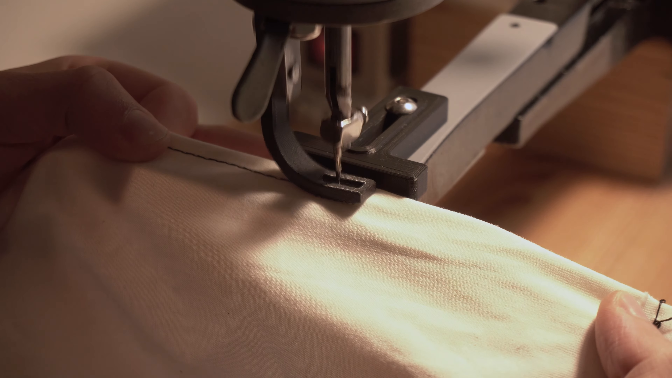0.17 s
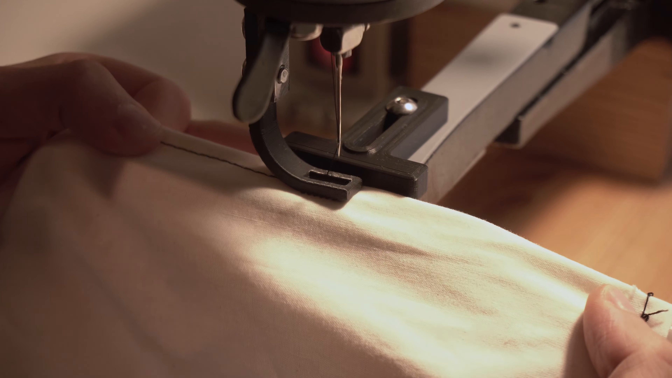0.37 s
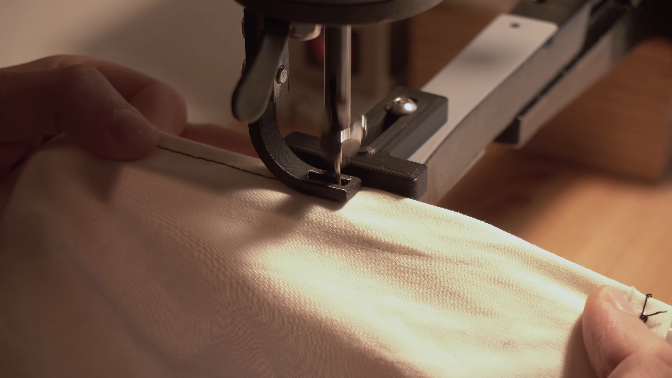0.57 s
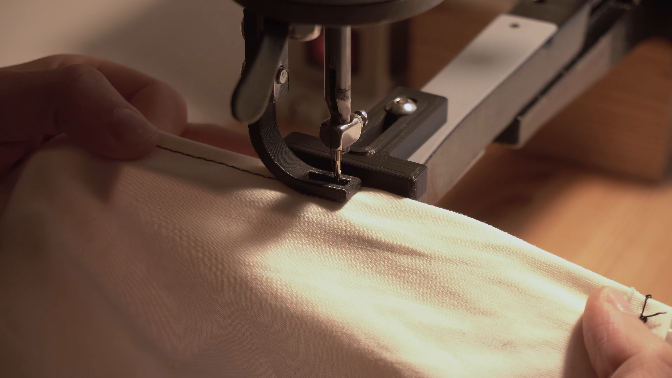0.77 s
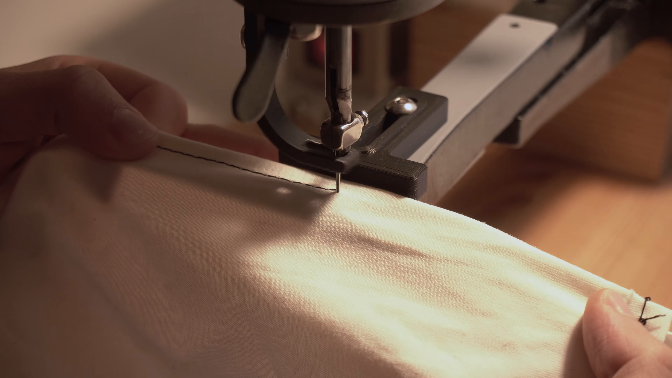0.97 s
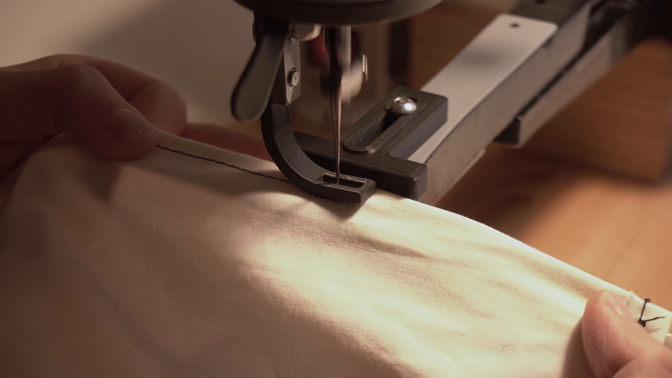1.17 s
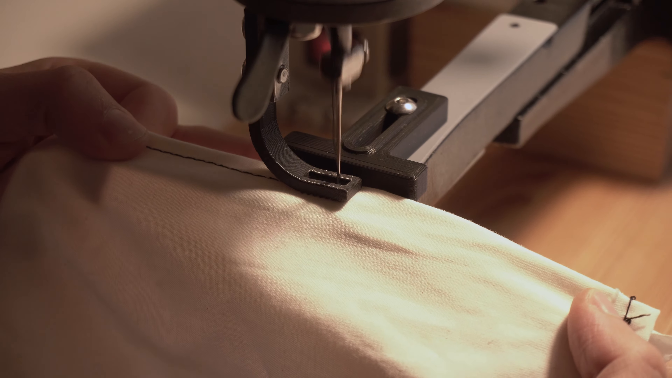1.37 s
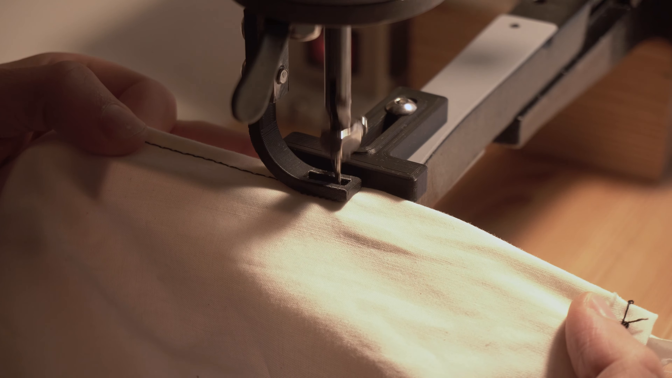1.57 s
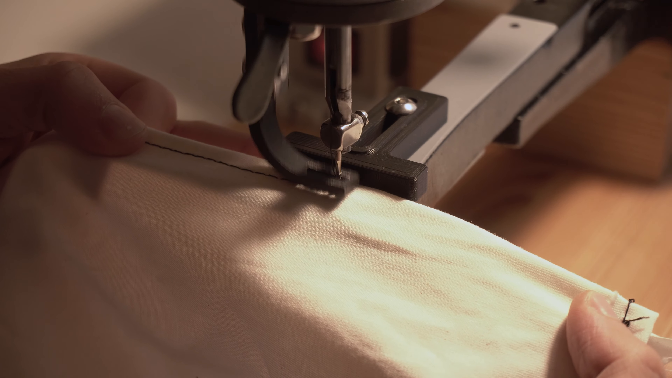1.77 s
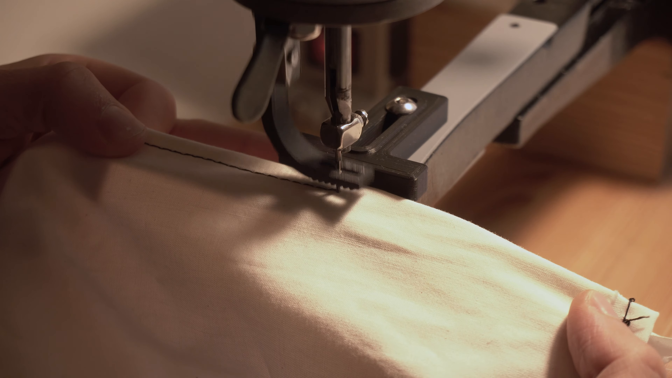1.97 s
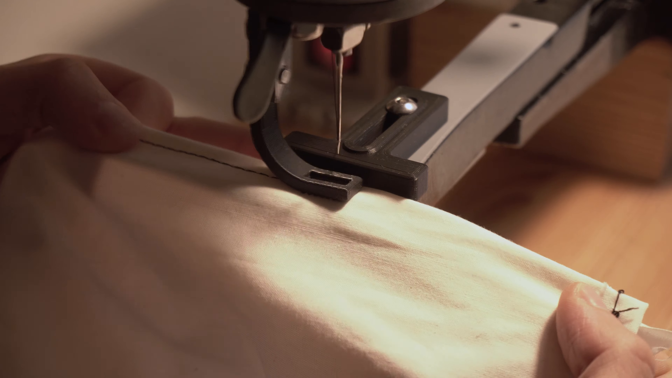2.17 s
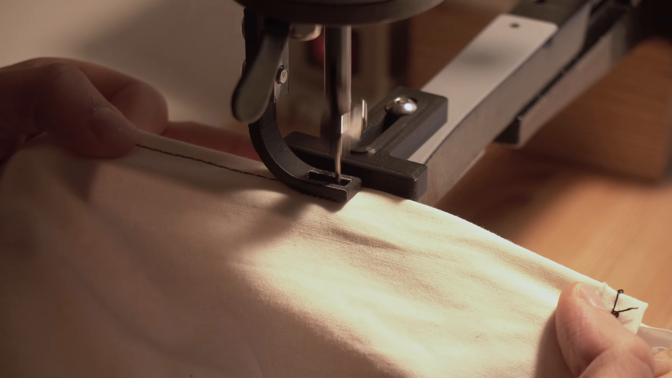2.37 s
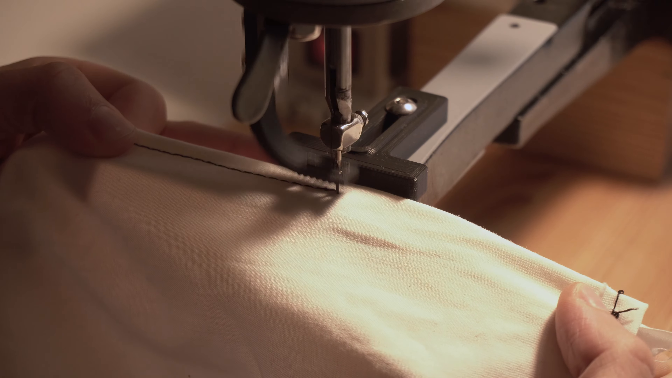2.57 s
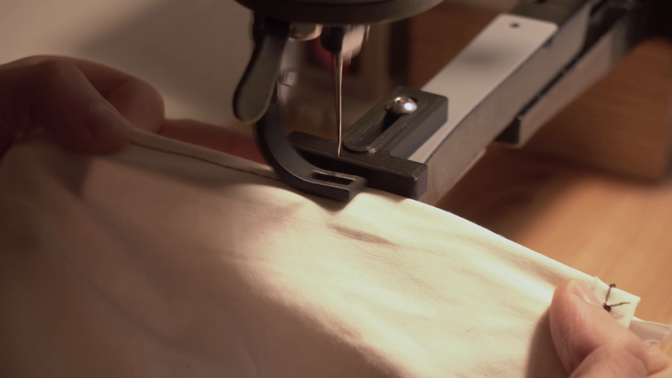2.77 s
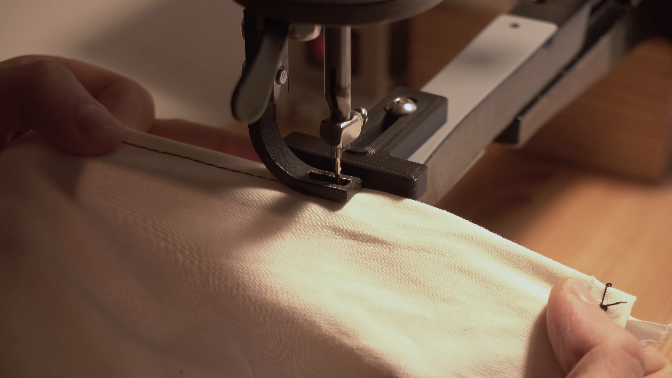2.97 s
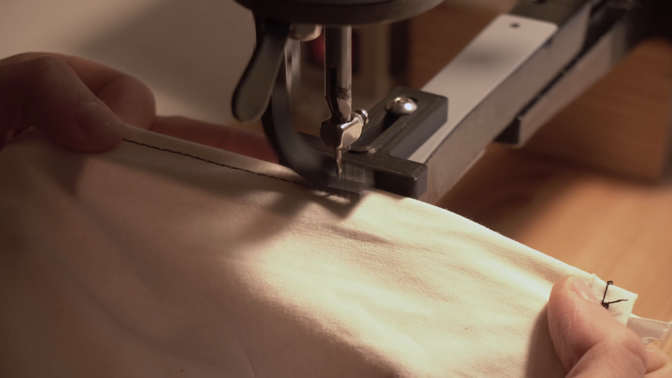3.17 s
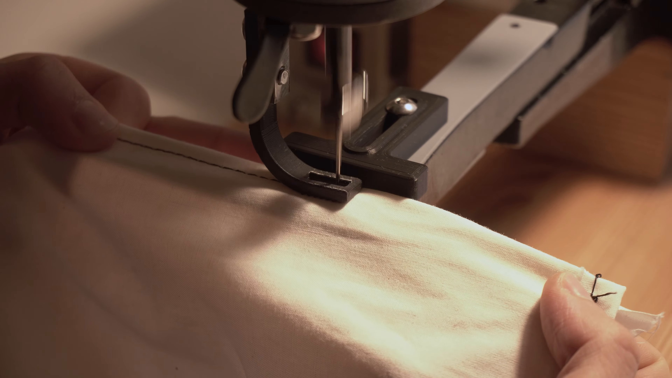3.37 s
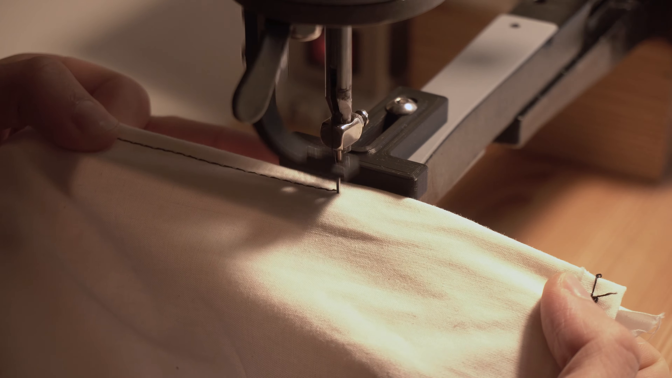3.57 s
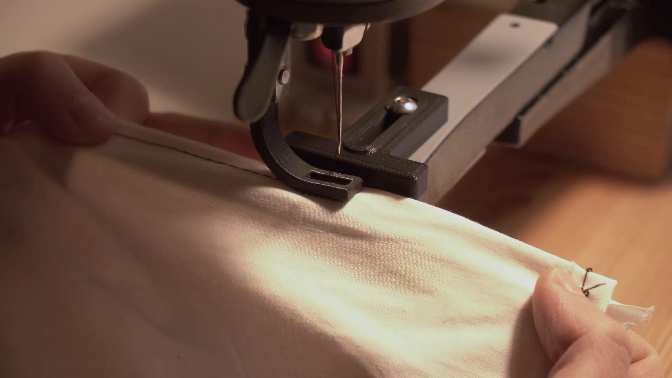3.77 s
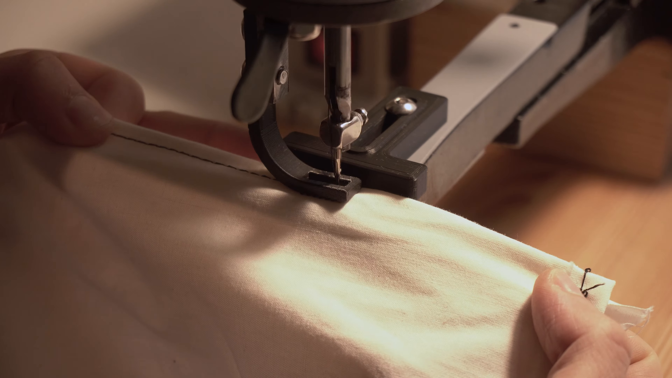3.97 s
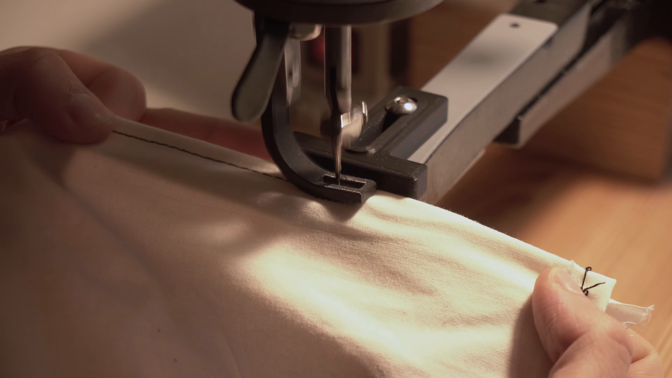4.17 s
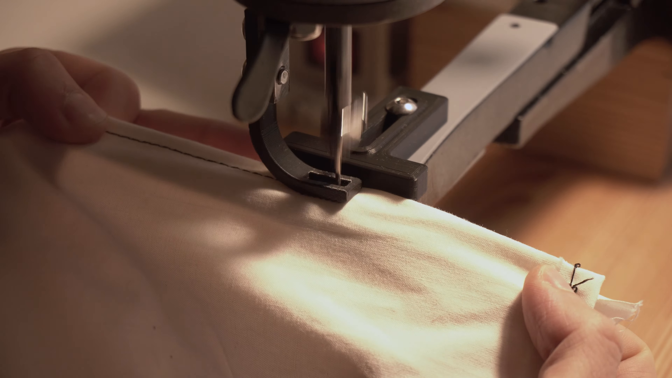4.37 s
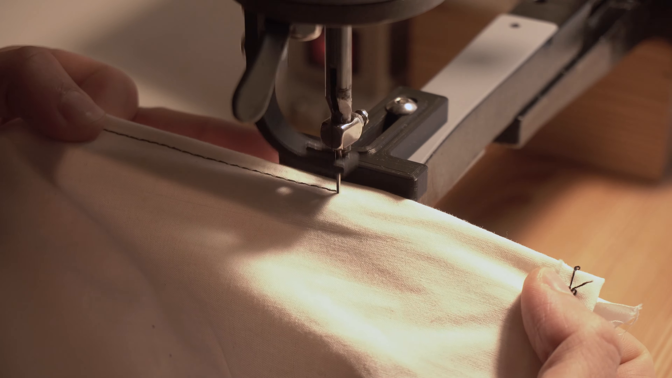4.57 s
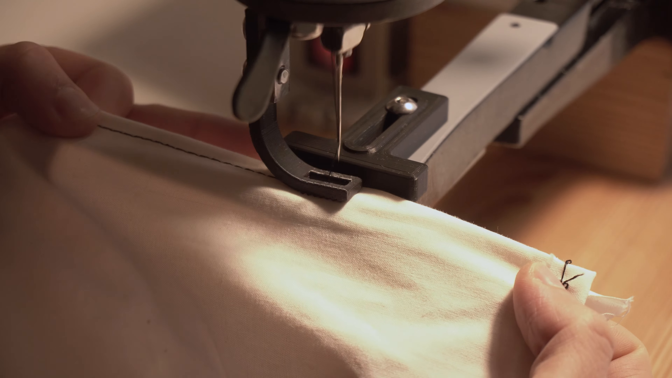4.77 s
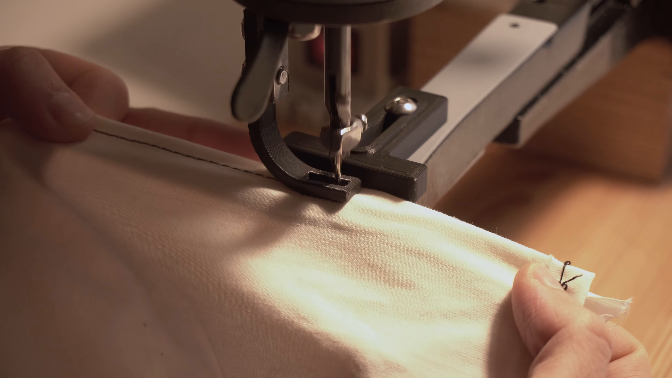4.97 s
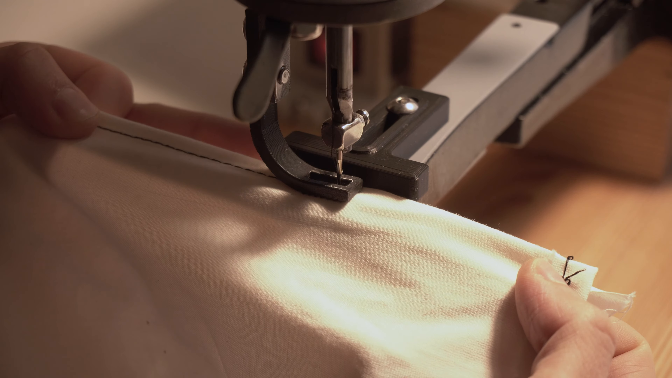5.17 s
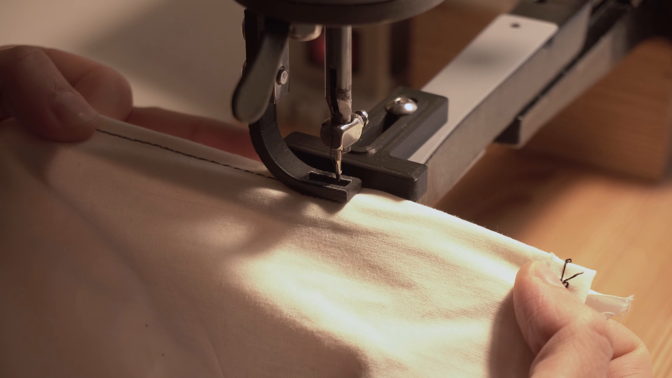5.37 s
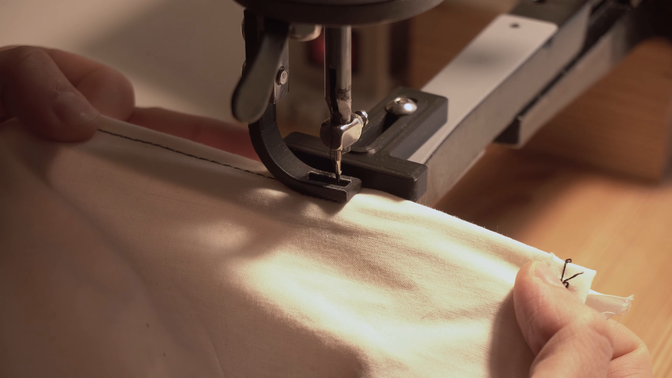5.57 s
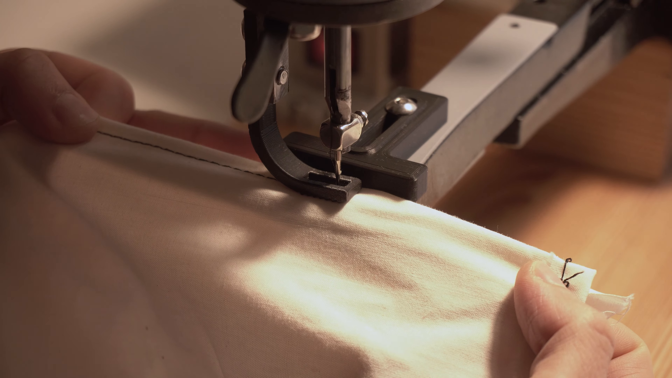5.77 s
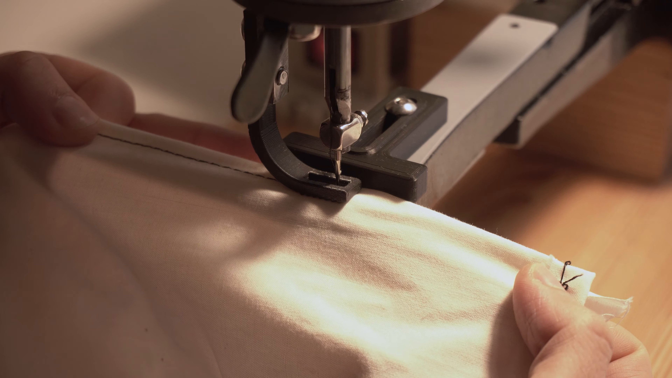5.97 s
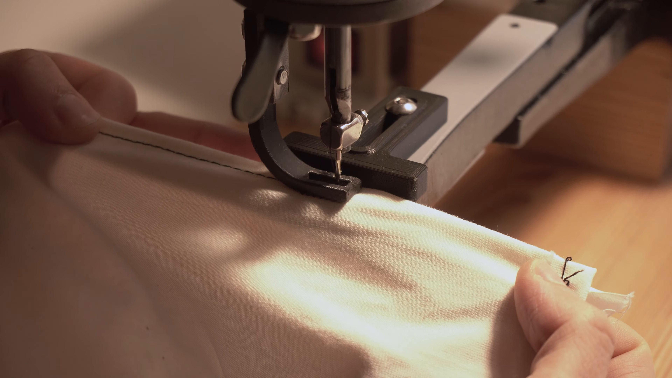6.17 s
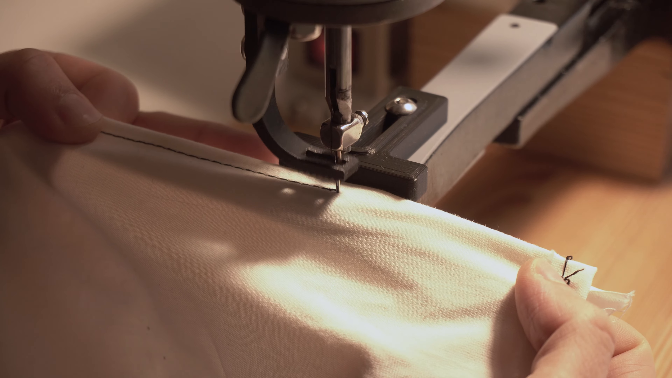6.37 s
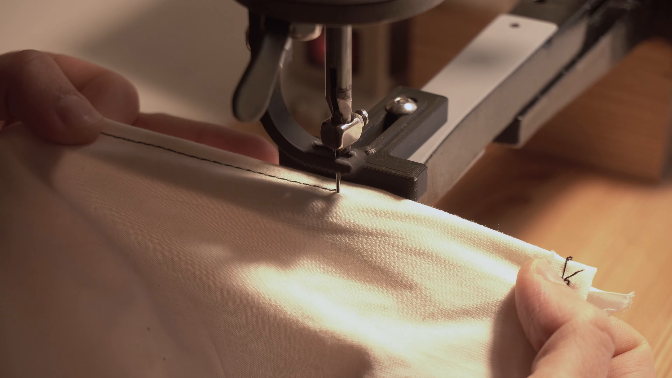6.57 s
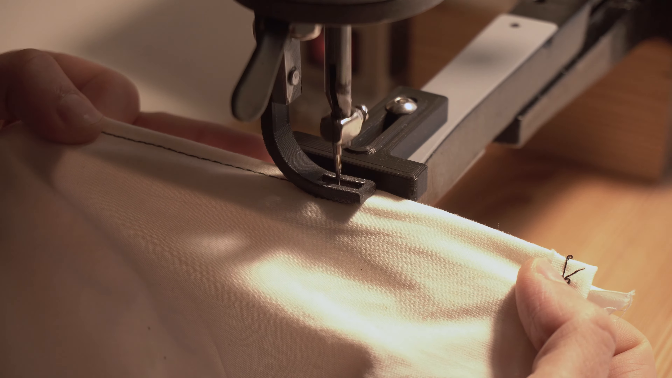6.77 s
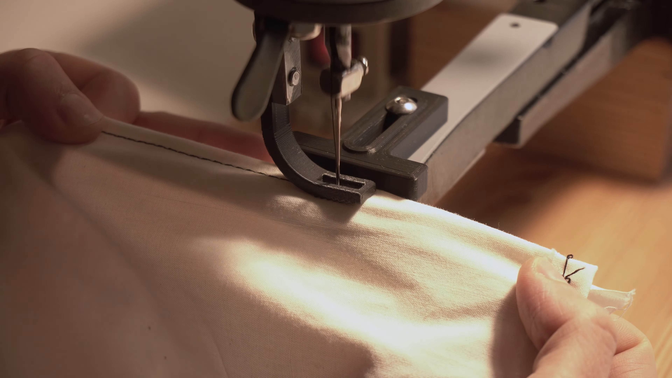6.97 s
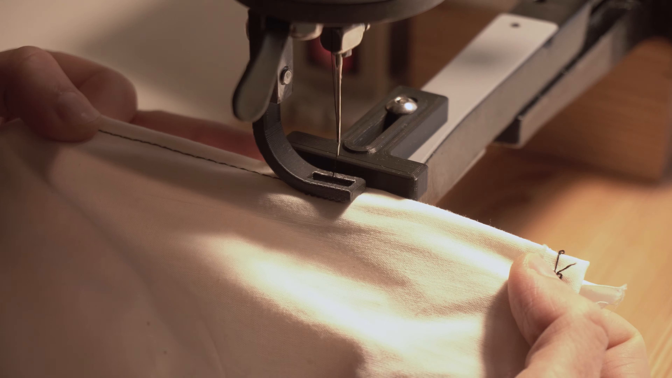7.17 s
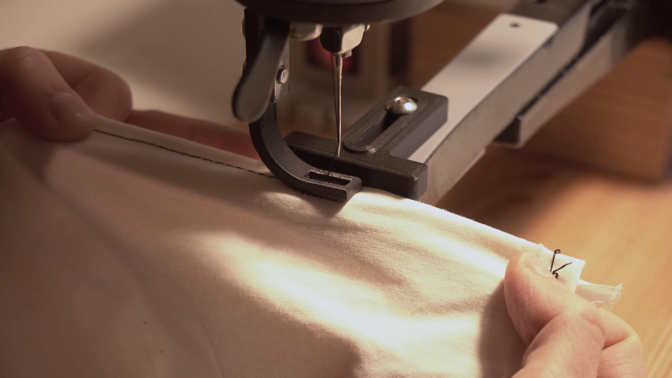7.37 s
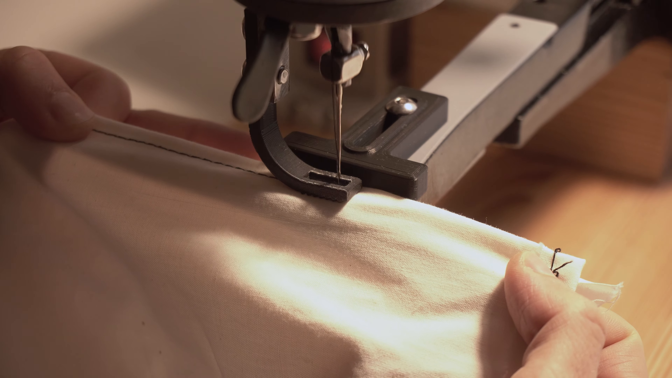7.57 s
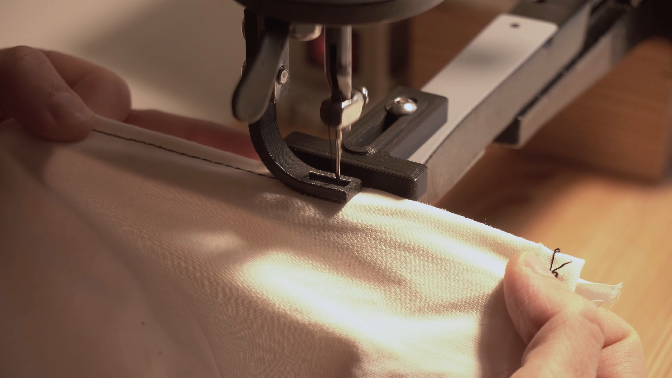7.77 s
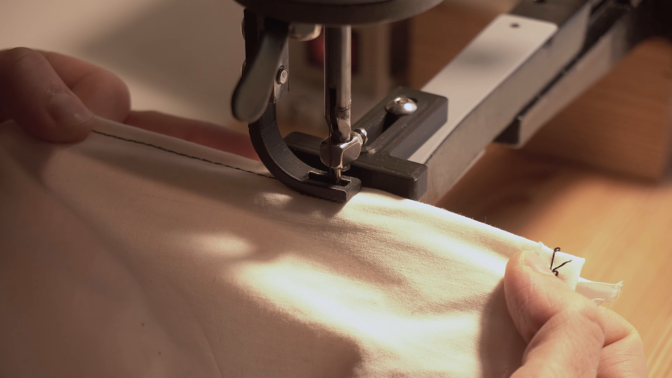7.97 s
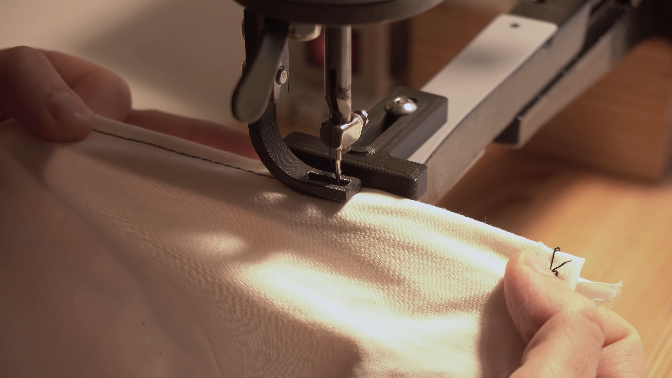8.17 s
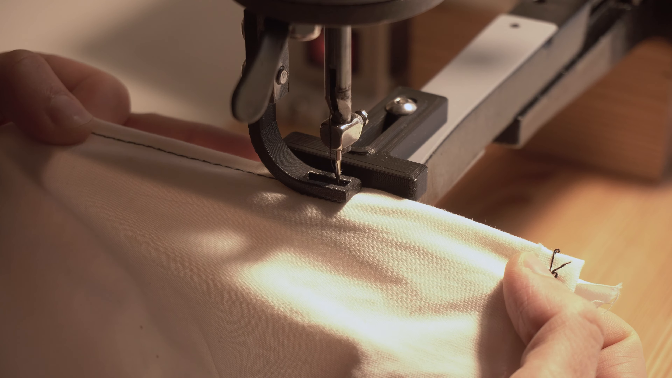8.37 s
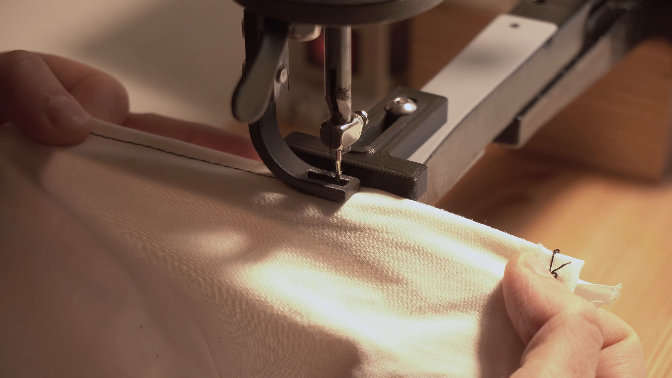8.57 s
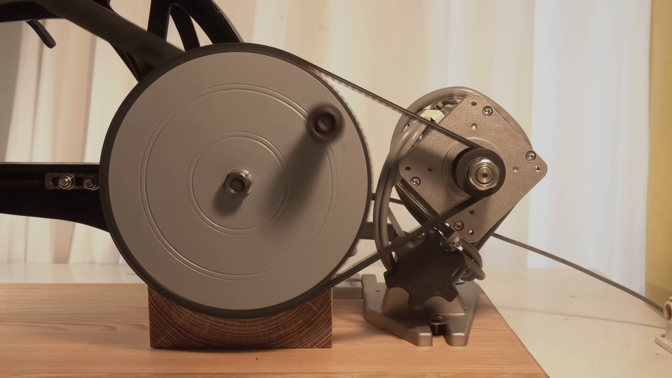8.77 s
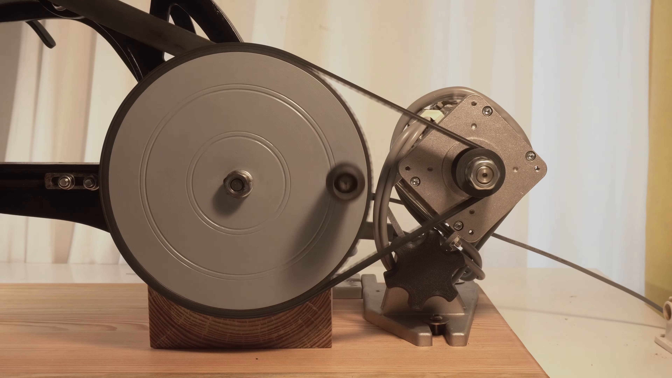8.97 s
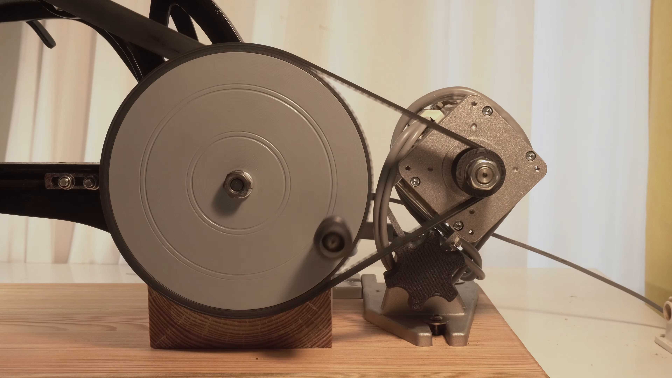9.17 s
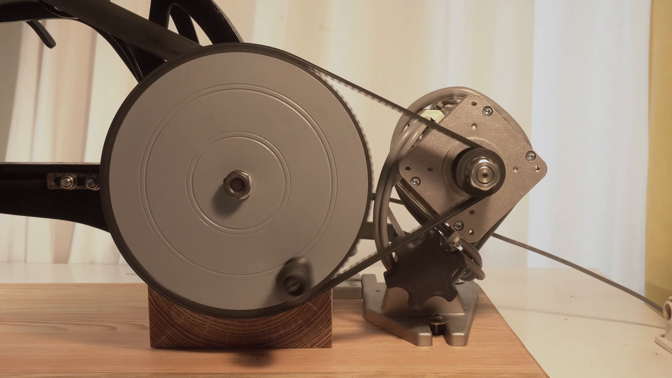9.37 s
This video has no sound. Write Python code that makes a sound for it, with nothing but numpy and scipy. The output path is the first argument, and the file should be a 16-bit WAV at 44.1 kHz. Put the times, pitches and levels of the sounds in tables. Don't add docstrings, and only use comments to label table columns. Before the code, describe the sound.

A heavy leather stitcher works close to the microphone: steel cracks, wooden knocks, scraping feed and singing thread over a low motor growl. Slow strokes become twice as fast with a higher motor whine, then stop abruptly. Quiet room tone follows, then a crawling motor with uneven paired wheel ticks, two sharper linkage clacks and loose rattling, ending in faint ticking and drone.

```python
import sys
import numpy as np
from scipy import signal
from scipy.fft import rfft, irfft, next_fast_len
from scipy.io import wavfile
from scipy.ndimage import map_coordinates

SR = 44100
rng = np.random.default_rng(int(sys.argv[2]) if len(sys.argv) > 2 else 0)


def ratio_of_db(decibels):
    return 10 ** (np.asarray(decibels, float) / 20)


def materialize(psi):
    bounded = np.clip(np.atleast_2d(psi).T, -1, 1)
    quanta = np.round(bounded * 32767).astype(np.int16)
    wavfile.write(sys.argv[1], SR, quanta)


N = 416304

# time in seconds, position in turns (whole at each drop of the foot).
CRANK = [(-.7365, -1), (.181, 0), (1.0985, 1), (2.0165, 2), (2.36, 2.375), (2.517, 2.59), (2.585, 2.691),
         (2.648, 2.8125), (2.7431, 3), (3.2355, 4), (3.7278, 5), (4.2195, 6), (4.712, 7), (4.92, 7.42),
         (5.1236, 7.581), (5.6, 7.6)]
# centre in Hz, width in Hz, level in dB.
TABLE = [(248.6, 46.7, 0), (406.8, 45.3, 2), (504, 74, -0.5), (714, 70, -4.5), (820, 74, -7.5),
         (970, 33, -16), (1300, 200, -18)]
# centre in Hz, width in Hz, level in dB.
WHEEL = [(2550, 120, -12), (3380, 190, -9), (4420, 60, -8), (4818, 91, -1), (6300, 300, -15),
         (6700, 200, -11.5), (9250, 360, -7), (10050, 81, -6.5), (13000, 1100, -14)]
# centre in Hz, width in Hz, level in dB.
NEAR_WHEEL = [(348, 28, 6.5), (1860, 410, -7.5), (11650, 3700, -10.5), (13700, 1100, -7.5)]
# frequency in Hz, density in dB per Hz.
CRACK = [(590, -35), (1000, -7), (2870, -0.5), (6090, -1.5), (6610, -4.5), (7090, 1), (9400, -4),
         (15700, -9.5), (16500, -33)]
GEAR_UP = 2.65
MOVE = 8.78


def unit(x):
    return x / np.sqrt(np.mean(x ** 2) + 1e-20)


def along(points, hz):
    f, v = np.transpose(points)
    return np.interp(np.log(hz + 1), np.log(f + 1), v)


def curves(rows):
    s, *cols = np.transpose(rows)
    return [np.interp(np.arange(N) / SR, s, c) for c in cols]


def wobble(rate):
    knots = rng.standard_normal(int(N * rate / SR) + 4)
    return map_coordinates(knots, [np.arange(N) * rate / SR])


def filtered(x, response):
    m = next_fast_len(N + SR // 2)
    return irfft(rfft(x, m) * response(np.fft.rfftfreq(m, 1 / SR)), m)[..., :N]


def modes(peaks):
    def response(f):
        total = 0
        for k, (centre, width, db) in enumerate(peaks):
            damping = 1j * f * width
            total = total + (-1) ** k * ratio_of_db(db) * damping / (centre * centre - f * f + damping)
        return total
    return response


def coloured(response):
    return unit(filtered(rng.standard_normal(N), response))


def bursts(times, level_db, t60, rise):
    env = np.zeros(N + SR)
    t = np.arange(SR // 3) / SR
    lives = np.broadcast_to(np.clip(t60, .003, .4), len(times))
    for s, db, life in zip(times, level_db, lives):
        start = max(round(s * SR), 0)
        env[start:][:len(t)] += ratio_of_db(db - 60 * t / life) * (1 - np.exp(-t / rise))
    return env[:N]


def rung(peaks, times, level_db, t60, rise=.00015):
    response = modes(peaks)
    gain = np.std(filtered(rng.standard_normal(N), response))
    blow = bursts(times, level_db, t60, rise) * rng.standard_normal(N)
    return filtered(blow, response) / gain


def turns():
    return curves(CRANK)[0]


def coast_db(s):
    cut_s, db_per_s = 4.92, -95
    return db_per_s * np.clip(s - cut_s, 0, None)


def motor():
    sag_curve = [(0, .02), (.1, .02), (.15, -.08), (.3, -.09), (.37, 0), (.55, -.02), (.68, .01), (1, .02)]
    # share of a turn, change of the tone in dB.
    pull_curve = [(0, -2), (.1, 0), (.15, 3), (.31, 5), (.36, 0), (.66, 0), (.72, -7), (.92, -7), (1, -2)]
    # time in seconds, pitch in Hz, level in dB.
    tone_track = [(0, 134.9, -58.5), (1.2, 135.6, -52), (2.4, 135.7, -53), (2.5, 151, -58.5),
                  (2.6, 225, -34), (2.75, 243.3, -41.5), (4.85, 242.7, -42), (5, 227.4, -43.5),
                  (5.1, 200, -80), (5.3, 201, -110)]
    # multiple of the pitch, level when slow in dB, when fast in dB.
    orders = [(1, -4.5, -6.5), (2, -2.5, 2), (3, -1, -12.5), (4, -5.5, -12)]
    # time in seconds, level in dB.
    effort_track = [(0, -46), (2.2, -47.5), (2.6, -42.5), (2.85, -40.5), (4.85, -40), (5.0, -46),
                    (5.2, -65.5), (5.35, -87), (5.875, -100), (5.9, -60.5), (6.3, -65.5), (7.0, -62.5),
                    (7.25, -52), (7.45, -60), (7.95, -63.5), (8.8, -66.5), (9.1, -78), (9.44, -72)]
    # centre in Hz, width in Hz, level in dB.
    boom_modes = [(138.4, 4.7, 9), (70, 23, -32)]
    # frequency in Hz, density in dB per Hz.
    whir_colour = [(410, -24), (700, -5.5), (1790, -15.5), (4170, -17.5), (4950, -20.5), (5650, -24.5),
                   (9850, -21), (15900, -30), (16500, -44)]
    boom_db, boom_slow_db = -13, 7
    whir_db, whir_grows = -7.5, 1.084
    slow_sag = 0.261

    angle = turns()
    slow = angle < 2.5
    pull_db = np.interp(angle % 1, *np.transpose(pull_curve))
    effort_db, = curves(effort_track)
    growl_db = effort_db + 0.35 * slow * pull_db
    boom_db = effort_db + boom_db + slow * (boom_slow_db + 1.7 * np.minimum(pull_db, 0))
    idle_db = effort_track[0][1]
    whir_db = idle_db + whir_grows * (effort_db - idle_db) + whir_db

    growl = ratio_of_db(growl_db + 2 * wobble(40)) * coloured(modes(TABLE))
    boom = ratio_of_db(boom_db + 1.7 * wobble(6)) * coloured(modes(boom_modes))
    grit = ratio_of_db(3 * wobble(150) + 1.5 * wobble(20))
    whir = ratio_of_db(whir_db) * grit * coloured(lambda hz: ratio_of_db(along(whir_colour, hz)))
    whir += ratio_of_db(whir_db - 11 + 3 * wobble(18)) * coloured(modes(WHEEL[1:4]))
    whir += ratio_of_db(whir_db - 17 + 5.0 * slow + 2.2 * wobble(11)) * coloured(modes(WHEEL[3::2]))

    hz, tone_db = curves(tone_track)
    sag = np.where(slow, slow_sag, 1) * np.interp(angle % 1, *np.transpose(sag_curve))
    phase = 2 * np.pi * np.cumsum(hz * (1 + sag + .012 * wobble(60))) / SR
    tone = np.zeros(N)
    for k, slow_db, fast_db in orders:
        tone += ratio_of_db(np.where(slow, slow_db, fast_db) + 2.5 * wobble(30)) * np.sin(k * phase)
    return growl + boom + whir + ratio_of_db(tone_db + pull_db) * tone


def thread():
    # share of a turn, feed scrape in dB, thread in its guides in dB.
    rub = [(0, -46.5, -63.5), (.22, -56.5, -73.5), (.285, -46.5, -50.5), (.41, -50.5, -50),
           (.46, -57.5, -60.5), (.67, -77.5, -74), (.707, -62, -50.5), (.82, -52.5, -67), (1, -70.5, -71.5)]
    # centre in Hz, width in Hz, level in dB.
    guide = [(7160, 100, -9), (10180, 670, 2.5), (11500, 330, -13.5), (14400, 300, -3)]
    fast_scrape_db, fast_sing_db = 8, 10.5

    angle = turns()
    fast = angle > GEAR_UP
    share, scrape, sing = np.transpose(rub)
    fade_db = 2.4 * coast_db(np.arange(N) / SR)
    jerks = 4 * wobble(250)
    scrape_db = np.interp(angle % 1, share, scrape) + fast_scrape_db * fast + fade_db + jerks
    sing_db = np.interp(angle % 1, share, sing) + fast_sing_db * fast + fade_db + jerks
    scraping = ratio_of_db(scrape_db) * coloured(lambda hz: ratio_of_db(along(CRACK, hz)))
    return scraping + ratio_of_db(sing_db) * coloured(modes(guide))


def still_air():
    # frequency in Hz, density in dB per Hz.
    still = [(240, -33.5), (400, -2), (842, -3.5), (1120, -5), (1990, -7), (14000, -13)]
    hum_db, = curves([(0, -85), (5.2, -67.5), (5.35, -78), (5.5, -91), (9.44, -88)])
    hum_phase = 2 * np.pi * np.cumsum(280 + 9 * wobble(30)) / SR
    hum = ratio_of_db(hum_db + 2.5 * wobble(15)) * np.sin(hum_phase)
    facing = np.clip((np.arange(N) / SR - MOVE) * 5, 0, 1)
    drone = ratio_of_db(-73 + 2.5 * wobble(16)) * facing * coloured(modes(NEAR_WHEEL[:2]))
    return hum + drone + ratio_of_db(-82.5) * coloured(lambda hz: ratio_of_db(along(still, hz)))


def stitches():
    # time in seconds, peak in dB, table knock in dB, brightness in dB,
    # ring in seconds.
    slow_stitch = [(0.181, -11.5, -12.5, -11, 0.063), (0.1882, -13.5, -18, -14, 0.062),
                   (0.2, -19.5, -12.5, -17, 0.06), (0.2155, -19.5, -6.5, -25.5, 0.048),
                   (0.2977, -35.5, -43, -11.5, 0.16), (0.375, -7.5, -24, -7.5, 0.026),
                   (0.3846, -12.5, -17, -14.5, 0.073), (0.4314, -16, -14, -7, 0.053),
                   (0.497, -31.5, -15.5, -17.5, 0.09), (0.5307, -25, -27, -15, 0.06),
                   (0.5694, -35.5, -7, -12, 0.074), (0.6545, -37, -4, -11, 0.054),
                   (0.8208, -21, -25, -8, 0.073), (0.8589, -34, -13, -5, 0.073),
                   (0.8894, -27.5, -9.5, -11.5, 0.06), (0.9317, -20.5, -4.5, -23, 0.06)]
    fast_stitch = [(3.7276, -6, -17.5, -9, 0.072), (3.7366, -3, -20, -14, 0.055),
                   (3.7402, -12, -16.5, -18, 0.042), (3.7504, -13, -13, -18.5, 0.072),
                   (3.7605, -21.5, -5, -15, 0.045), (3.804, -17, -21, -3.5, 0.031),
                   (3.8303, -4, -14, -5.5, 0.029), (3.8369, -11, -15.5, -14.5, 0.047),
                   (3.862, -18.5, -9, -9.5, 0.066), (3.8979, -20, -12, -7.5, 0.065),
                   (4.0141, -26.5, 4.5, -18.5, 0.077), (4.0185, -18, -15, -19.5, 0.05),
                   (4.0664, -19, -15, -10.5, 0.077), (4.128, -11, -7.5, -23.5, 0.02),
                   (4.1333, -17, -5.5, -15, 0.084), (4.1626, -21.5, -8.5, -10.5, 0.068)]
    lead_in = [
        [(1.068, -32, -21, -10, .05), (1.0825, -16.5, -20, -9, .1)],
        [(4.204, -27, -25, -8, .07), (4.2105, -10, -24, -7, .13)],
    ]
    halt = 7.5

    s, turn = np.transpose(CRANK)
    slow = (list(slow_stitch) + list(lead_in[0]), -1, GEAR_UP, -2)
    fast = (list(fast_stitch) + list(lead_in[1]), GEAR_UP, halt, 0)
    rows = []
    for pattern, first, last, force_db in (slow, fast):
        for when, db, *rest in pattern:
            at = np.interp(when, s, turn) % 1 + np.arange(-1, 8)
            times = np.interp(at[(at >= first) & (at < last)], turn, s)
            for t in times[times > 0]:
                rows.append((t, db + force_db + coast_db(t) + rng.normal(0, 1.2), *rest))
    return rows


def blows():
    # share of a turn, peak when slow in dB, peak when fast in dB.
    hard = [
        (0, -8, -6),
        (0.2114, -18.5, -9.5),
    ]
    # time in seconds, peak in dB.
    hard_crawl = [
        (6.6894, -17),
        (7.0608, -18),
    ]
    s, turn = np.transpose(CRANK)
    at = np.arange(8)
    rows = []
    for share, slow_db, fast_db in hard:
        db = np.where(at < GEAR_UP, slow_db, fast_db) + rng.normal(0, 1.5, len(at))
        rows.append(np.c_[np.interp(at + share, turn, s), db])
    return np.vstack(rows + [hard_crawl]).T


def snaps(times, level_db):
    spike = np.sign(rng.standard_normal(N)) * bursts(times, level_db, 0.0055, rise=.0001)
    return filtered(spike, modes([(8950, 6100, 0.0052)]))


def linkage():
    # time in seconds, peak in dB, table knock in dB,
    # brightness in dB, ring in seconds.
    crawl_stitch = [(6.6573, -32, -12.5, -18.5, 0.1), (6.6728, -28.5, -18.5, -12.5, 0.073),
                    (6.6905, -21.5, -25, -12.5, 0.038), (6.6971, -23, -8.5, -22.5, 0.066),
                    (6.716, -29, -11, -27, 0.11), (6.7383, -30.5, -15, -21, 0.17),
                    (7.0614, -16, -22.5, -4, 0.044), (7.0749, -25, -26, -17.5, 0.07),
                    (7.1315, -23.5, -22.5, -27.5, 0.1), (7.1544, -29.5, -13.5, -23, 0.085),
                    (7.1794, -32, -15.5, -23.5, 0.13), (7.2204, -43.5, -5.5, -14, 0.19),
                    (7.2616, -23.5, -27.5, -11.5, 0.1), (7.299, -39, -19, -14.5, 0.08),
                    (7.3828, -38.5, -8, -16, 0.072), (7.5437, -30.5, -26, -15, 0.085),
                    (7.5824, -39.5, -16, -6, 0.12), (7.6122, -30, -23.5, -9, 0.17),
                    (7.652, -39.5, -16, -14, 0.1), (7.6838, -37.5, -21, -9.5, 0.08),
                    (7.7327, -36.5, -13.5, -7.5, 0.099)]
    # time in seconds, peak in dB, table knock in dB,
    # brightness in dB.
    strays = [(1.236, -17.5, -29.5, -21), (1.49, -31, -20.5, -11), (2.3098, -27.5, -27, -5),
              (2.4517, -28.5, -13.5, -8), (2.5164, -26.5, -9, -22), (5.6444, -66, -1, -26.5),
              (6.0485, -40.5, -9, -7.5), (8.375, -43.5, -18.5, -6.5), (8.6516, -34, -11, -19),
              (8.6689, -45.5, 1, -12), (9.018, -50.5, -1, -12)]
    # centre in Hz, width in Hz, level in dB.
    steel = [(2502, 65, -1.5), (5120, 40, -4), (6430, 110, -12.5), (7010, 81, 1), (9360, 100, 2),
             (9860, 94, -5), (9940, 45, -1), (11900, 56, -4.5), (12600, 160, -6.5), (13100, 100, -5),
             (15400, 83, -13), (15500, 49, -8.5)]
    # centre in Hz, width in Hz, level in dB.
    knock = [(410, 120, 4.5), (808, 120, 8), (930, 130, 8.5), (1260, 430, 3.5), (1560, 180, -6),
             (1700, 640, -7.5), (2390, 520, -4.5)]
    stray_ring_s = 0.076

    contacts = stitches() + list(crawl_stitch) + [(*row, stray_ring_s) for row in strays]
    s, db, knock_db, bright_db, ring = np.transpose(contacts)

    def dull(hz):
        return ratio_of_db(along(CRACK, hz)) / np.sqrt(1 + (hz / 9000) ** 8)

    def sharp(hz):
        return ratio_of_db(along(CRACK, hz)) / np.sqrt(1 + (9000 / (hz + 1)) ** 8)

    x = snaps(*blows()) + snaps(s, db - 19.5)
    x += rung(steel, s, db - 12.5, 0.13 * ring)
    x += rung(knock, s, db + knock_db - 2.0, 0.86 * ring, rise=0.0022)
    for colour, level_db in ((dull, db - 15.0), (sharp, db + bright_db - 4.5)):
        crack = bursts(s, level_db, 0.0074, rise=.0001)
        chatter = bursts(s, level_db - 6.5, ring, rise=0.0014)
        chatter *= ratio_of_db(4.05 * wobble(400))
        x += (crack + chatter) * coloured(colour)
    return x


def steps():
    # firm step in seconds, peak in dB, seconds since the light one.
    pairs = [(5.959, -51, .0675), (6.046, -47, .048), (6.1704, -47, .05), (6.2601, -45.5, 0.024),
             (6.325, -48.5, .038), (6.4218, -45.5, .0524), (6.5132, -43.5, .0434), (6.6242, -44.5, 0.041),
             (6.798, -46.5, 0.043), (6.8953, -48, .045), (7.0237, -45.5, .0702), (7.364, -51, 0.046),
             (7.478, -42.5, .0565), (7.7954, -43, 0.076), (7.9534, -42, .0768), (8.0397, -46.5, .0469),
             (8.113, -43.5, 0.043), (8.2365, -43.5, .0451), (8.356, -44, 0.0454), (8.479, -43, .0512),
             (8.5936, -50.5, 0.051), (8.7275, -42, .09), (8.8946, -47.5, .0677), (8.987, -48, .0487),
             (9.098, -53, .043), (9.1889, -46, .0446), (9.3098, -47.5, .0479), (9.422, -51, .049)]
    # time in seconds, peak in dB, ring in seconds.
    thuds = [
        (4.997, -35, 0.11),
        (5.124, -35.5, 0.1),
        (7.218, -37, 0.11),
        (7.274, -38, 0.11),
        (7.381, -36.5, 0.097),
        (7.534, -42, 0.068),
        (8.66, -44, 0.093),
        (8.726, -47.5, 0.34),
        (9.185, -71, 0.085),
    ]
    light_db = -2
    firm_knock_db, light_knock_db = -8, -18.5

    firm, firm_db, gap = np.transpose(pairs)
    s = np.r_[firm, firm - gap]
    db = np.r_[firm_db, firm_db + light_db]
    knock_db = np.repeat([firm_knock_db, light_knock_db], len(firm))
    late = s > MOVE
    click = bursts(s, db - 14.5, 0.021, rise=0.00054) * coloured(lambda hz: ratio_of_db(along(CRACK, hz)))
    ping_phase = 2 * np.pi * np.cumsum(4830 + 90 * wobble(200)) / SR
    ping = bursts(s, db - 13.5 - 5 * late, 0.085, rise=0.00085) * np.sin(ping_phase)
    near = rung(NEAR_WHEEL, s[late], db[late] - 11.5, 0.068)
    when, thud_db, ring = np.transpose(thuds)
    thump = rung(TABLE, s, db + knock_db - 1.5, 0.087) + rung(TABLE, when, thud_db - 3.5, ring)
    return rung(WHEEL, s, db - 12, 0.079) + click + ping + near + thump


def room(x, t60_share):
    # frequency in Hz, t60 in seconds.
    decay = [(200, 0.32), (2000, 0.43), (12000, 0.14)]
    out, hop = np.zeros(N + SR), SR // 4
    for start in range(0, N, hop):
        hz, t, z = signal.stft(rng.standard_normal(SR // 3), SR, nperseg=128)
        t60 = t60_share * along(decay, hz)
        tail = signal.istft(z * ratio_of_db(-60 * t / t60[:, None]), SR, nperseg=128)[1]
        wet = signal.fftconvolve(x[start:start + hop], tail / np.linalg.norm(tail))
        out[start:start + len(wet)] += wet
    return out[:N]


def scene():
    # frequency in Hz, side over mid in dB.
    width = [(60, -17), (150, -44), (380, -27), (950, -12), (2380, -10), (5980, -7.5), (15000, -4)]
    machine = motor() + thread() + still_air() + linkage() + steps()
    mid = machine + ratio_of_db(-7.5) * room(machine, t60_share=0.79)
    side = room(machine, t60_share=.1) + ratio_of_db(0.5) * room(machine, t60_share=.9)
    side = filtered(side, lambda hz: ratio_of_db(along(width, hz) - 2.3))
    return np.array([mid + side, mid - side])


def band_limit(x):
    return signal.sosfilt(signal.butter(12, 16970, fs=SR, output="sos"), x)


def record(dry):
    hiss = ratio_of_db(-92.5) * rng.standard_normal(dry.shape)
    mix = filtered(dry + hiss, lambda hz: (hz < 16900) * (hz / 90) ** 2 / np.sqrt(1 + (hz / 90) ** 4))
    return band_limit(mix)


dry = scene()
out = record(dry)
materialize(out)
```